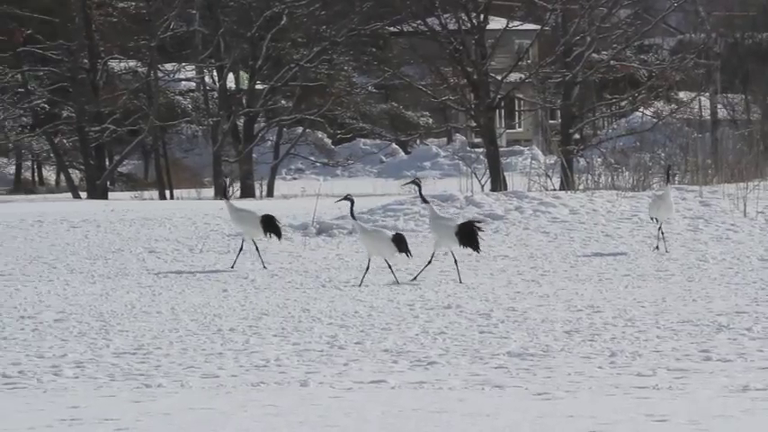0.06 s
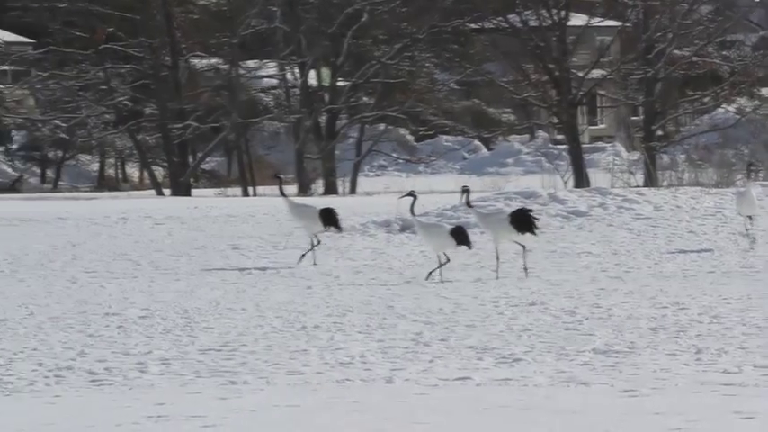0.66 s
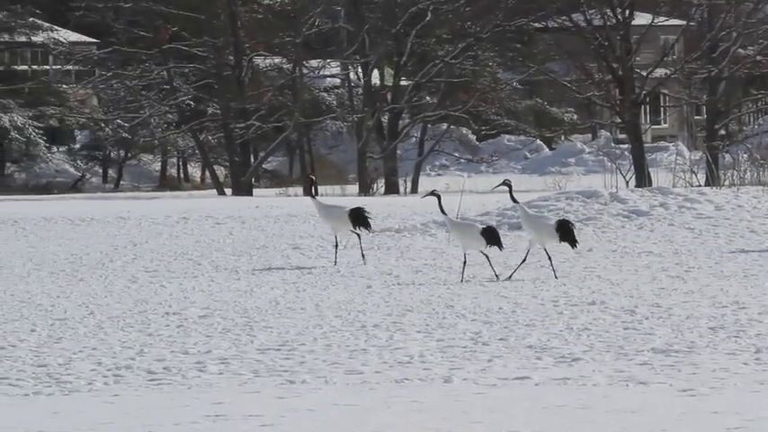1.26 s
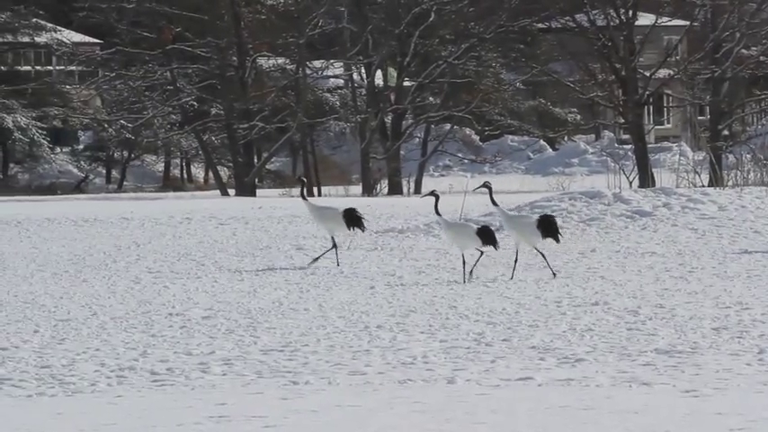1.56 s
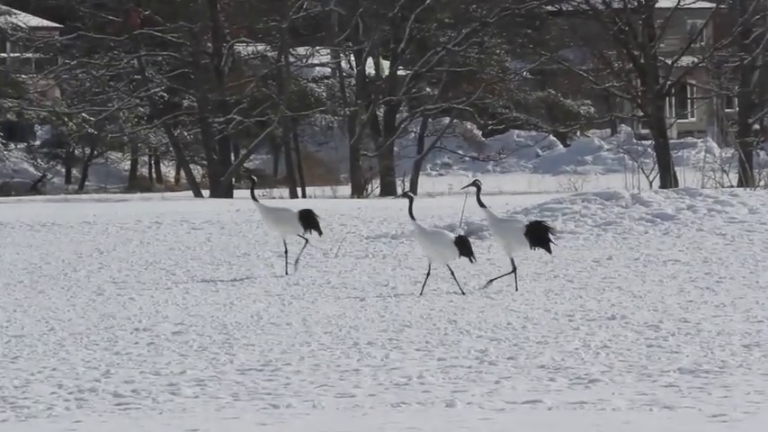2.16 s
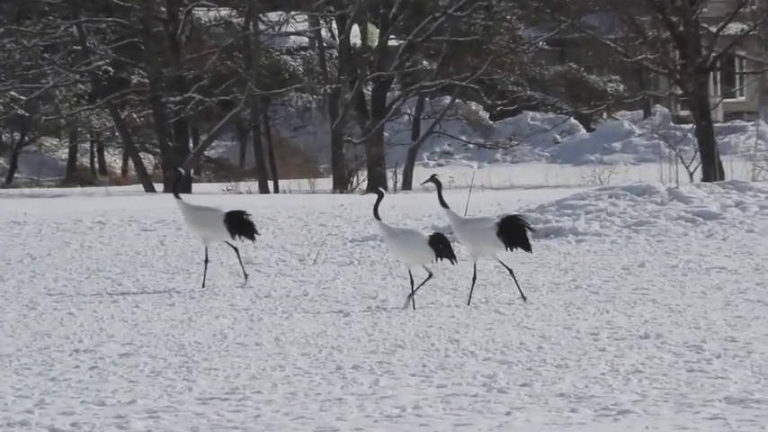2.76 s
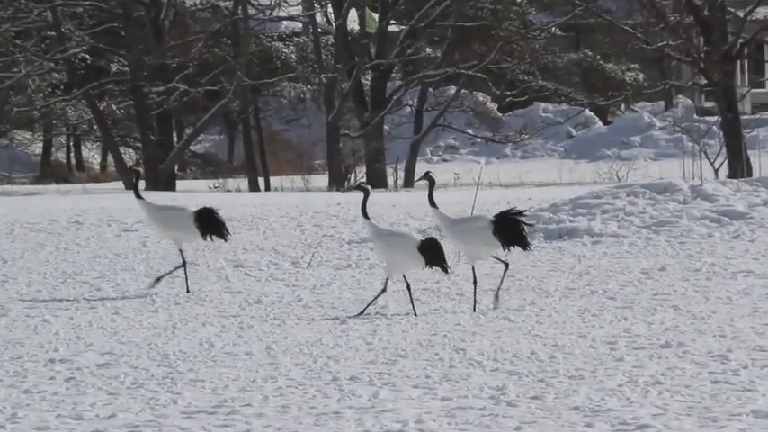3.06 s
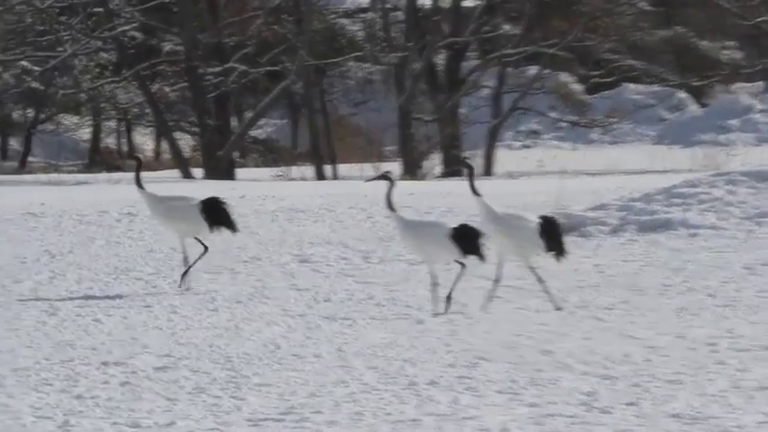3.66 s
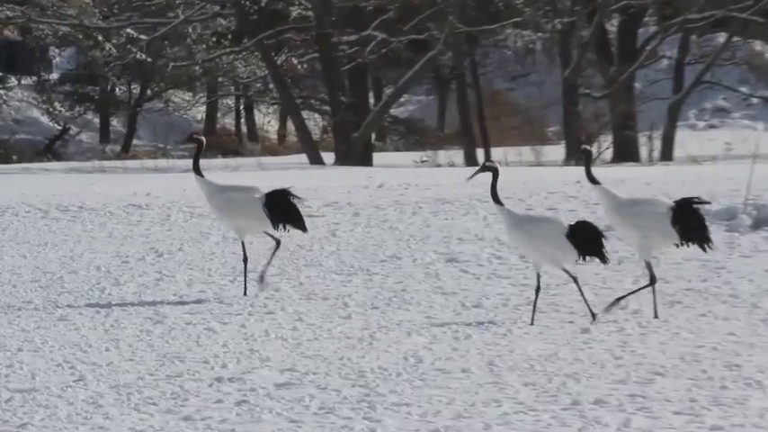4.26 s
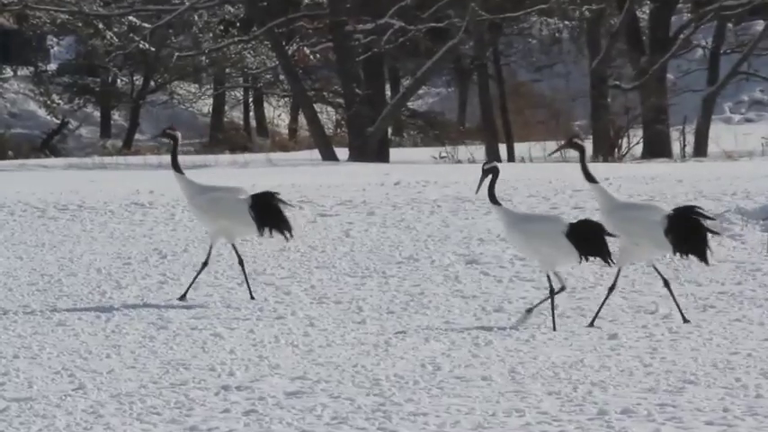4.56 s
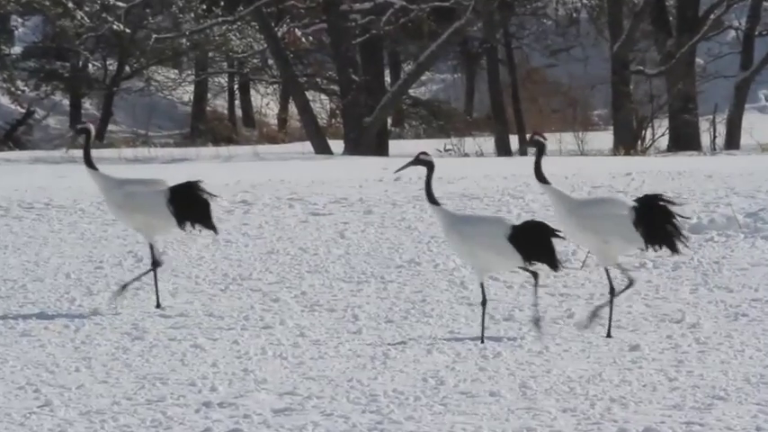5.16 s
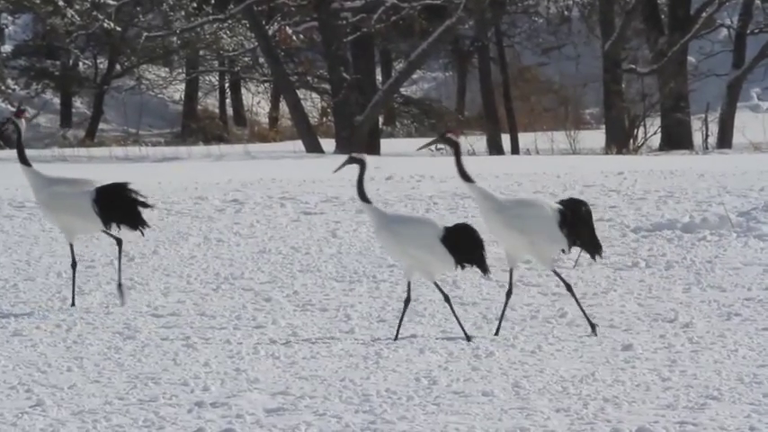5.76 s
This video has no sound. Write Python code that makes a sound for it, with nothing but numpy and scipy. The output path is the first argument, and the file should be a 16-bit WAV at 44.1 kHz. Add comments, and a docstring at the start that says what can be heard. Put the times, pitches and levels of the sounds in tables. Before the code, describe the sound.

On an open snowy field, a crane gives three loud bugling calls about two seconds apart. Each rattles in, holds one clear reedy note and rattles out as it sinks, echoing off the trees. Another crane honks once, far off, between the second and third calls. Wind thumps and pops on the microphone throughout, with close dry rustles, tiny ticks and a few faint chirps from small birds over a soft hush.

```python
"""A crane gives three loud bugling calls over a snowy field; another honks once, far off.
Membranes in its voice box buzz like a reed, and its windpipe rings. Each call rattles in, holds one
clear note and rattles out as it sinks. The trees echo it, and small birds chirp faintly.
Wind thumps and pops on the microphone, and something rustles and ticks close by, over a soft hush.
The loudest moments push the volume down, and it creeps back up."""
import sys
import numpy as np
from scipy import signal
from scipy.io import wavfile
from scipy.ndimage import uniform_filter1d

SR = 44100
rng = np.random.default_rng(int(sys.argv[2]) if len(sys.argv) > 2 else 0)


def pcm_store(signal):
    """Save signal as 16-bit PCM."""
    levels = np.round(np.clip(np.atleast_2d(signal), -1, 1) * 32767)
    wavfile.write(sys.argv[1], SR, levels.astype(np.int16).T)


N = 265482
TIME = np.arange(N) / SR

# The near crane's calls. Each row: when it starts, clears, breaks and ends in seconds, held pitch in Hz,
# starting level in dB, swell in dB per second, then harmonic 2, harmonic 3 and the brassy top in dB
# against the base note, and how far harmonics 2 and 3 drop at the break in dB.
BUGLES = [(.569, .702, 0.87, 1.012, 1193, -22.5, 12, -1.5, -12, -8, 3),
          (2.957, 3.097, 3.287, 3.44, 1187, -17.5, -9, -7.5, -26.5, -30, 7),
          (5.116, 5.213, 5.422, 5.58, 1185, -21.5, -6, -2.5, -14.5, -30.5, 6)]
# How a call sinks. Each row: seconds after the break, drop in pitch in Hz.
PITCH_FALL = [(-.1, 0), (-.05, 5), (-.012, 19.5), (.005, 71.5), (.035, 135), (.07, 291), (.12, 359),
              (.18, 501)]
# The brassy top of a call. Each row: frequency in Hz, relative level in dB.
BRASSY_TOP = [(4700, -2.5), (5900, -6.5), (7100, -11), (8400, -20), (10800, -15), (13000, -22.5),
              (15800, -35)]
# The tone sent toward the trees. Each row: frequency in Hz, relative level in dB.
TONE_TO_TREES = [(1200, 5), (2400, -14.5), (3600, -19.5), (4800, -26), (6000, -25.5), (7200, -39),
                 (15000, -60)]
# The far crane's call: start in seconds, length in seconds, pitch in Hz, base level in dB.
FAR_HONK = (4.277, .112, 872, -35.5)
# How its throat shapes the tone. Each row: frequency in Hz, boost or cut in dB.
FAR_THROAT = [(850, -0.5), (1700, 2.5), (2600, -8.5), (3450, -18), (4300, -23), (5200, -35)]
# Echoes from the trees. Each row: delay in seconds, relative level in dB.
ECHOES = [(.135, -19), (.238, -18.5), (.37, -20)]
# Small birds. Each row: time in seconds, pitch in Hz, level in dB, length in seconds.
CHIRPS = [(.28, 2470, -53, 0.066), (0.374, 2570, -53.5, .06), (2.868, 2900, -49, 0.027),
          (4.563, 8160, -50, 0.024)]
# Gusts. Each row: start in seconds, hold in seconds, level in dB, turbulence (adds brightness) in dB.
GUSTS = [(0, 0.056, -11, 0), (.17, .31, -21.5, -1.5), (.507, 0.036, -11, 7), (.57, .18, -17.5, -1),
         (.89, .13, -30, 0), (1.03, .24, -25.5, 2), (2.455, 0.092, -9.5, 5), (2.56, 0.071, -14, 4.5),
         (2.67, 0.17, -17.5, 9), (3.086, 0.038, -11, 2), (3.226, .21, -11.5, -2), (3.508, 0.056, -18, 1.5),
         (3.655, 0.18, -18, 3), (3.825, 0.099, -8, 3.5), (3.938, 0.15, -13.5, 2.5), (4.355, 0.088, -14, 0),
         (4.538, 0.048, -19, 1), (4.74, 0.066, -20, 1), (4.796, 0.087, -14, -1), (4.975, .12, -20, 6),
         (5.165, 0.025, -23.5, -2)]
# Lone swirls of air. Each row: time in seconds, level in dB, length in seconds, turbulence in dB.
PUFFS = [(1.102, -15.5, 0.021, -2), (1.514, 0, .016, -4.5), (1.55, -6.5, 0.016, 2.5),
         (1.763, -14.5, 0.017, -1), (2.037, -16, 0.013, -2.5), (2.197, -16, 0.01, -4),
         (2.237, -13, .014, -4), (2.368, -11, 0.035, -5), (2.934, -13.5, .012, -1.5),
         (3.185, -12, 0.019, -1), (4.248, -19.5, 0.016, -4), (4.315, -14, 0.014, -4),
         (4.691, -12, 0.018, -5), (5.604, -12.5, 0.0098, -9)]
# Light wind between gusts. Each row: time in seconds, level in dB.
LIGHT_WIND = [(0, -21.5), (.85, -38), (1.38, -38), (1.55, -27), (1.85, -27.5), (2.2, -28), (2.9, -30),
              (4.2, -37), (5.3, -37), (6.02, -39.5)]
# The tone of a strong gust. Each row: frequency in Hz, relative level in dB, dB gained per dB of gust.
WIND_TONE = [(30.7, -72, -0.5), (63, -49.5, 0.34), (123, -38.5, 0.52), (235, -38, 0.99), (440, -50.5, 1.35),
             (808, -60.5, 1.61), (1240, -81, 2.5), (1800, -102, 0)]
# Sharp pops, mostly from wind in the microphone's opening; the one at 1.508 s is a hard crack at the loudest
# moment. Each row: time in seconds, relative level in dB, pitch in Hz.
POPS = [(.353, -9.5, 480), (.396, -9.5, 483), (.511, -1.5, 624), (1.508, 4, 1240), (1.511, -2, 148.6),
        (1.527, 0.5, 1250), (1.556, -8, 1190), (1.597, -16, 1100), (1.761, -4.5, 445), (2.450, -5, 563),
        (2.489, -2, 610), (2.815, -3.5, 530), (3.408, 1.5, 565), (3.534, -7.5, 534), (3.678, -12, 500),
        (3.771, -5.5, 520), (3.869, 1.5, 650), (3.918, -4, 1010), (3.968, -0.5, 660), (4.045, -7, 554),
        (5.013, -12.5, 500)]
# Swishes. Each row: time in seconds, relative level in dB, length in seconds, tilt in dB per octave.
SWISHES = [(0.025, -50.5, .15, -1.5), (0.313, -55, .06, -1), (.97, -59, .2, 0), (1.236, -43, .16, 1),
           (1.41, -52.5, .1, -1), (1.68, -56, 0.18, 2), (1.903, -46, .11, -2), (2.227, -51, .22, 0),
           (2.879, -52, 0.65, 5.5), (3.8, -52, 0.13, 2.5), (4.232, -54, 0.35, 2.5),
           (4.996, -52.5, 0.21, -3.5)]
# The tone of the rustling. Each row: frequency in Hz, relative level in dB.
RUSTLE_TONE = [(1200, -39), (2500, -37.5), (4500, -38), (6500, -40), (9500, -38), (13400, -35)]
# Crisp ticks. Each row: time in seconds, relative peak in dB, middle frequency in Hz.
TICKS = [(1.150, -19.5, 7550), (1.1895, -16.5, 7800), (1.3067, -19, 6950), (1.4306, -21.5, 5000),
         (1.5135, -22, 11100), (1.687, -26, 2900), (3.408, -31, 3500), (3.895, -26, 9540),
         (4.0846, -28.5, 11100), (5.666, -31.5, 11000)]
# The tone of still air. Each row: frequency in Hz, base level in dB per Hz.
AIR_TONE = [(30, -74), (100, -63.5), (250, -71), (500, -74.5), (1000, -72.5), (1500, -84), (2200, -85.5),
            (3500, -91), (6000, -97), (11000, -102), (16000, -112)]
# The volume of the steady hush, turned down during wind and creeping back up afterwards.
# Each row: time in seconds, boost or cut in dB.
HUSH_VOLUME = [(0, -2.5), (1.3, 0.5), (2, -3), (4, -2.5), (5, 3), (6.02, 4)]


def bugle(start, clear, crack, end, held_hz, *levels_db, open_rattle_hz=68.5, close_rattle_hz=60.5,
          settle_s=0.0382, scoop_hz=165, windpipe_width_hz=600, waver_db=4.0):
    """A reedy tone that breaks into pulses at low pressure. Two rows: toward us, toward the trees."""
    live = (TIME >= start) & (TIME < end)
    t = TIME[live]
    opening = np.clip((clear - t) / settle_s, 0, 1)
    closing = np.clip((t - crack) / 0.0068 + .5, 0, 1)
    open_beats = (t - start) * open_rattle_hz - 0.413
    close_beats = (t - crack) * close_rattle_hz - 0.766
    beat = 2 * np.pi * np.where(t < crack - .02, open_beats, close_beats)
    depth = np.clip(0.68 * opening + 0.72 * closing, 0, 1)
    pulses = (1 + depth * np.cos(beat)) / np.sqrt(1 + depth ** 2 / 2)
    # opening pulses sweep upward; closing ones arch over and scatter in pitch
    swing = 0.071 * opening * np.sin(beat) + .06 * closing * (np.cos(beat) - .5)
    jitter = (0.00085 + 0.0203 * opening + 0.0482 * closing) * drift(336)[live]
    scoop = scoop_hz * np.clip((clear - t) / (clear - start), 0, 1) ** 1.3
    pitch = (held_hz - scoop - along(PITCH_FALL, t - crack)[0]) * (1 + swing + jitter)
    phase = 2 * np.pi * np.cumsum(pitch) / SR
    level_db, second_db, third_db, brassy_db = bugle_levels(t, start, clear, crack, *levels_db)
    rasp = 0.31 * opening + 0.38 * closing
    tone = np.zeros((2, len(t)))
    for k in range(1, 15):  # harmonic k sounds at k times the pitch
        hz = k * pitch
        past_second = np.clip((hz - 2700) / 600, 0, 1)
        past_third = np.clip((hz - 3700) / 600, 0, 1)
        # the windpipe rings at twice the held pitch, even while the note sinks
        windpipe_db = -10 * np.log10(1 + ((hz - 2 * held_hz) / windpipe_width_hz) ** 2)
        low_db = (1 - past_second) * (second_db + windpipe_db) + past_second * third_db
        top_db = brassy_db + at_hz(BRASSY_TOP, hz)[0] + waver_db * drift(2.7)[live]
        overtone_db = (1 - past_third) * low_db + past_third * top_db
        # the membranes slap unevenly as they rattle, smearing high harmonics most
        smear = rasp * k / 2
        harmonic = (1 + smear * drift(260)[live]) * np.sin(k * phase)
        harmonic += smear * drift(235)[live] * np.cos(k * phase)
        harmonic /= np.sqrt(1 + 2 * smear ** 2)
        tone += from_db([overtone_db * (k > 1), at_hz(TONE_TO_TREES, hz)[0]]) * harmonic
    fade = np.clip((t - start) / 0.0012, 0, 1) * np.clip((end - t) / 0.011, 0, 1)
    out = np.zeros((2, N))
    out[:, live] = from_db(level_db) * np.sqrt(2) * tone * pulses * fade
    return out


def bugle_levels(t, start, clear, crack, level_db, swell_db_per_s, second_db, third_db, brassy_db,
                 drop_db, bloom_s=0.14, hold_s=0.034, fade_db_per_s=135, overtone_fade_db_per_s=65):
    """Overtones bloom as pressure builds; after the break, the base note dies away fastest."""
    weak = np.clip(1 - (t - start) / bloom_s, 0, 1)
    dying_s = np.maximum(t - crack - hold_s, 0)
    lasting_db = (fade_db_per_s - overtone_fade_db_per_s) * dying_s
    broken = np.clip((t - crack) / 0.014 + .5, 0, 1)
    broken_db = lasting_db - drop_db * broken
    # the brassy top flares just before the note clears, then mellows by 19 dB
    flare_s = t - clear + 0.024
    flare_db = 71 * np.minimum(flare_s, 0) - np.clip(115 * flare_s, 0, 19)
    return (level_db + swell_db_per_s * (np.minimum(t, crack) - start) - fade_db_per_s * dying_s,
            second_db - 10 * weak + broken_db,
            third_db - 4 * weak + broken_db,
            brassy_db + flare_db + lasting_db)


def far_honk(sag_hz=55, rough=0.02, attack_s=.006, release_s=.03):
    """A distant crane's short, lower call, strongest in its second harmonic; it sags as it ends."""
    start, length, hz, level_db = FAR_HONK
    t = np.clip(TIME - start, 0, length)
    pitch = hz - sag_hz * (t / length) ** 2
    phase = 2 * np.pi * np.cumsum(pitch * (1 + rough * drift(156))) / SR
    tone = sum(from_db(at_hz(FAR_THROAT, k * pitch)[0]) * np.sin(k * phase) for k in range(1, 7))
    fade = np.minimum(t / attack_s, 1) * np.minimum((length - t) / release_s, 1)
    return tone * from_db(level_db) * fade


def tree_echoes(calls, ring_s=1.94, scatter_db=-21, build_s=0.016, top_hz=6500):
    """Trunks scatter the calls into a thin tail, with a few clear echoes."""
    t = TIME[:2 * SR]
    tail = band(rng.standard_normal(len(t)), 600, top_hz)
    tail *= from_db(-60 * t / ring_s) * (1 - np.exp(-t / build_s))
    tail *= from_db(scatter_db) * np.sqrt(2 * top_hz / SR / np.sum(tail ** 2))
    echoes = sum(from_db(db) * np.interp(TIME - delay, TIME, calls, left=0) for delay, db in ECHOES)
    return signal.fftconvolve(calls, tail)[:N] + band(echoes, 1950, 7600)


def wind(lumpy_db=2.6, churn_db=2.5, attack_s=0.017, release_db_per_s=352, strong_gust_db=-10.5):
    """Air swirls against the microphone: a stronger gust is louder and brighter."""
    lumps = from_db(lumpy_db * drift(37.0))
    # each swirl is a pair: its push over time, its turbulence in dB
    swirls = [(lumps * from_db(along(LIGHT_WIND, TIME)[0]), -1.0)]
    for start, hold, db, turbulence_db in GUSTS:
        rise = np.clip((TIME - start) / attack_s + 1, 0, 1)
        fall_db = release_db_per_s * np.clip(TIME - start - hold, 0, 1)
        swirls.append((lumps * rise * from_db(db - fall_db), turbulence_db))
    swirls += [(from_db(db) * swell(s, length), turbulence_db) for s, db, length, turbulence_db in PUFFS]
    power = sum(push ** 2 for push, _ in swirls)
    turbulence_db = sum(push ** 2 * db for push, db in swirls) / power
    gust_db = 10 * np.log10(power) - strong_gust_db + turbulence_db + churn_db * drift(74)
    rumble = np.zeros(N)
    for hz, noise in noise_bands(WIND_TONE):
        level_db, growth = at_hz(WIND_TONE, hz)
        rumble += noise * from_db(level_db + growth * gust_db)
    # scale the rumble so its loudness follows the push of the air
    excess = uniform_filter1d(uniform_filter1d(rumble ** 2 / power, size=600), size=600)
    return rumble / np.sqrt(excess + 1e-9)


def sharp_pops(cycles=0.93, gain_db=-4.0):
    """Each pop is about one swing of pressure; most come from small, fast swirls of air."""
    out = np.zeros(N)
    for s, db, hz in POPS:
        wave = np.sin(2 * np.pi * (hz * (TIME - s) + rng.random()))
        out += from_db(db + gain_db) * swell(s, cycles / hz) * wave
    return out


def rustle(gain_db=-3.0, grain_db=2.5, rest_db=-61, pivot_hz=8000):
    """A fine, dry, grainy hiss that comes in swishes."""
    swishes = [(swell(s, length) ** 2, db, tilt) for s, db, length, tilt in SWISHES]
    hiss = np.zeros(N)
    for hz, noise in noise_bands(RUSTLE_TONE):
        octaves = np.log2(hz / pivot_hz)
        power = sum(shape * from_db(db + tilt * octaves) ** 2 for shape, db, tilt in swishes)
        hiss += noise * from_db(at_hz(RUSTLE_TONE, hz)[0]) * np.sqrt(from_db(rest_db) ** 2 + power)
    hiss = signal.sosfilt(signal.butter(4, 13000, fs=SR, output="sos"), hiss)
    return hiss * from_db(gain_db + grain_db * drift(310))


def ticks(ring_s=0.0029, gain_db=2.5, faint_count=14, faint_db=-35.5, faint_hz=11000):
    """Tiny snaps of noise that die within milliseconds; the faintest fall at random times."""
    out, t = np.zeros(N + SR), TIME[:SR // 20]
    faint = [(s, faint_db, faint_hz) for s in rng.random(faint_count) * N / SR]
    for s, peak_db, hz in TICKS + faint:
        burst = rng.standard_normal(len(t)) * from_db(-60 * t / ring_s)
        snap = band(burst, hz * 0.61, hz * 1.38)
        at = round(s * SR)
        out[at:at + len(t)] += from_db(peak_db + gain_db) * snap / np.abs(snap).max()
    return out[:N]


def small_birds(slide=0.059, rough=0.026):
    """Faint, buzzy chirps that slide downward."""
    out = np.zeros(N)
    for s, hz, level_db, length in CHIRPS:
        pitch = hz * (1 - slide * np.tanh((TIME - s) / length) + rough * drift(280))
        out += from_db(level_db) * swell(s, length) * np.sin(2 * np.pi * np.cumsum(pitch) / SR)
    return out


def field_air(patchy_db=1.73):
    """The steady hush of the field; a set curve turns it down during wind and lets it creep back."""
    hush = sum(noise * from_db(at_hz(AIR_TONE, hz)[0] + patchy_db * drift(9.5))
               for hz, noise in noise_bands(AIR_TONE))
    return hush * from_db(along(HUSH_VOLUME, TIME)[0])


def turn_down(x, threshold_db=-16, squeeze=0.42, recovery_db_per_s=16.5, react_s=0.026):
    """Loud moments push the volume down; it creeps back afterwards."""
    keep = np.exp(-1 / (react_s * SR))
    level_db = 10 * np.log10(signal.lfilter([1 - keep], [1, -keep], x ** 2) + 1e-12)
    cut_db = squeeze * np.maximum(level_db - threshold_db, 0)
    recovered_db = recovery_db_per_s * TIME
    return x * from_db(recovered_db - np.maximum.accumulate(cut_db + recovered_db, axis=-1))


def from_db(db):
    """Turn decibels into a number to multiply by."""
    return 10 ** (np.asarray(db) / 20)


def unit_power(x):
    """Scale a signal to an average power of 1."""
    return x / np.sqrt(np.mean(x ** 2) + 1e-20)


def along(rows, t):
    """Read a table's columns at the times t."""
    times, *columns = np.transpose(rows)
    return [np.interp(t, times, c) for c in columns]


def at_hz(rows, hz):
    """Read a table's columns at the given frequencies."""
    freqs, *columns = np.transpose(rows)
    return [np.interp(np.log(hz), np.log(freqs), c) for c in columns]


def drift(rate):
    """A smooth random wobble, about 1 in size, that changes about rate times a second."""
    r = np.exp(-20 * np.pi * rate / SR)
    slow = signal.lfilter([1], [1, -2 * r, r * r], rng.standard_normal(N // 10 + 4002))[4000:]
    return np.interp(np.arange(N) / 10, np.arange(len(slow)), unit_power(slow))


def band(x, low, high):
    """Keep the frequencies between low and high, in Hz."""
    return signal.sosfilt(signal.butter(2, [low, min(high, .45 * SR)], "band", fs=SR, output="sos"), x)


def noise_bands(rows):
    """Half-octave slices of noise (0 dB per Hz) over a table's range, as (middle Hz, noise)."""
    edges = 22 * 2 ** np.arange(0, 10, .5)
    for low, high in zip(edges, edges[1:]):
        if high > rows[0][0] and low < rows[-1][0]:
            noise = unit_power(band(rng.standard_normal(N), low, high))
            yield np.sqrt(low * high), noise * np.sqrt(high - low)


def swell(peak_s, length):
    """A bell-shaped rise and fall; length is its width in seconds at half power."""
    return 2 ** (-2 * np.minimum(((TIME - peak_s) / length) ** 2, 20))


def scene():
    """Birds and their echoes, with wind and rustling at the microphone, in one channel."""
    toward_us, toward_trees = sum(bugle(*row) for row in BUGLES)
    distant = far_honk() + small_birds()
    birds = toward_us + distant + tree_echoes(toward_trees + distant)
    return (birds + field_air() + wind() + sharp_pops() + rustle() + ticks())[None]


def record(dry, cutoff_hz=15750):
    """Turn loud moments down, clip any peaks still too big, and cut the highest treble."""
    clipped = np.clip(turn_down(dry), -1, 1)
    return signal.sosfilt(signal.ellip(10, .1, 90, cutoff_hz, fs=SR, output="sos"), clipped)


dry = scene()
out = record(dry)
pcm_store(out)
```